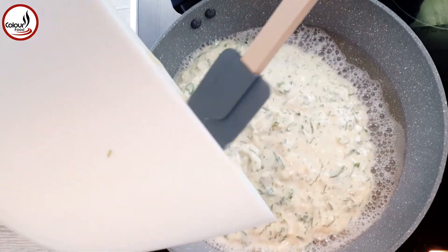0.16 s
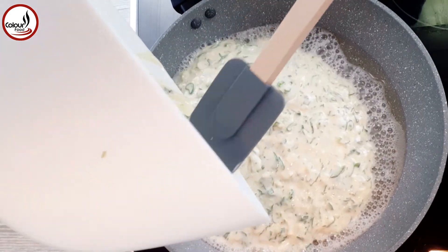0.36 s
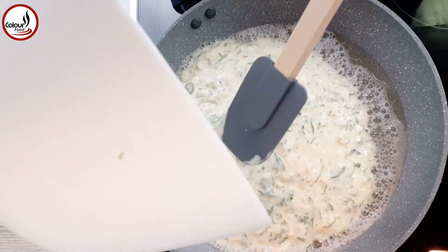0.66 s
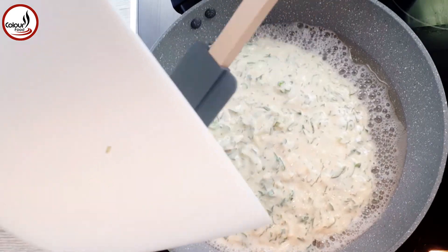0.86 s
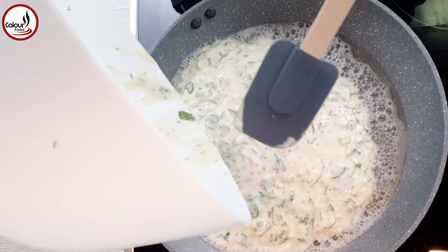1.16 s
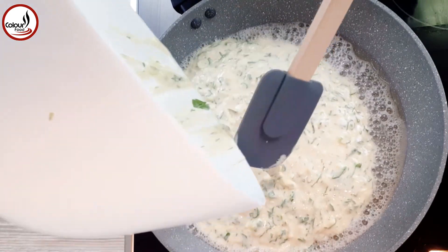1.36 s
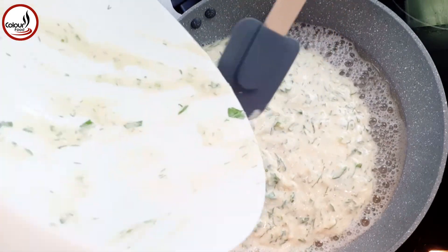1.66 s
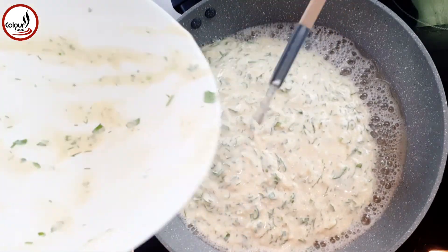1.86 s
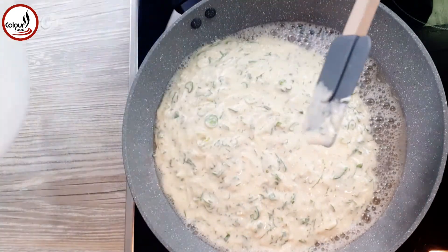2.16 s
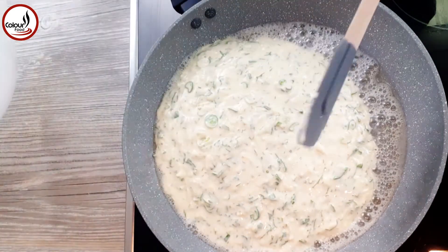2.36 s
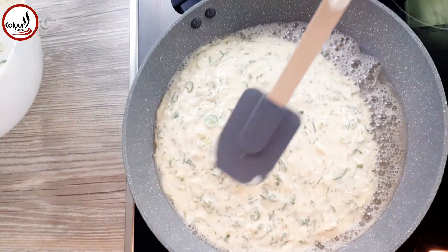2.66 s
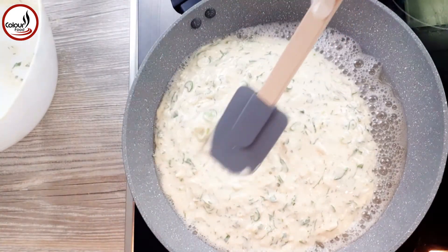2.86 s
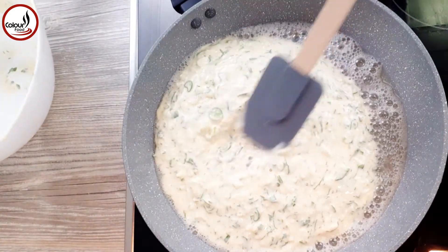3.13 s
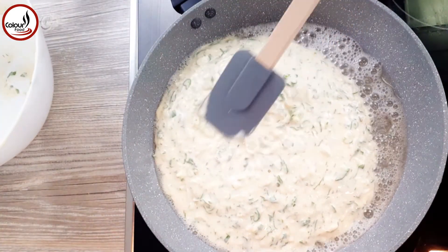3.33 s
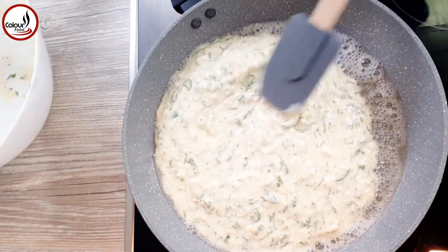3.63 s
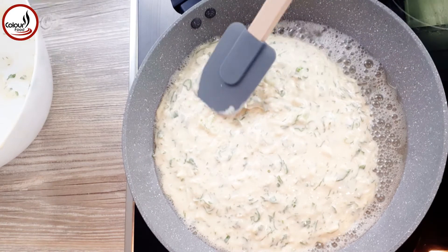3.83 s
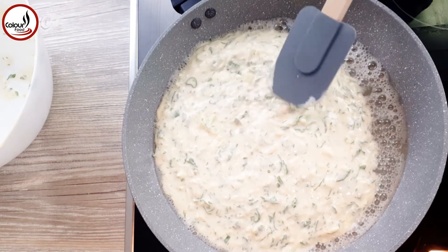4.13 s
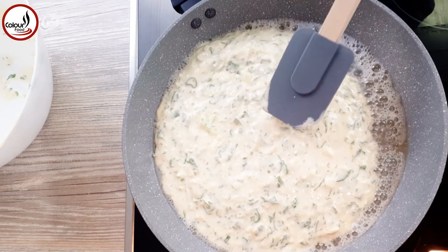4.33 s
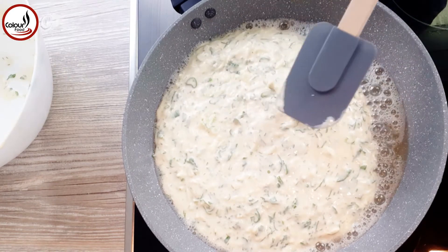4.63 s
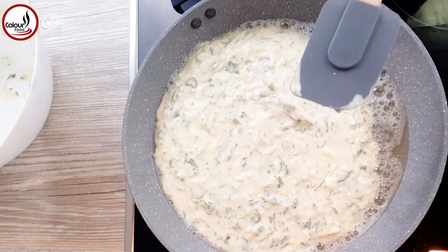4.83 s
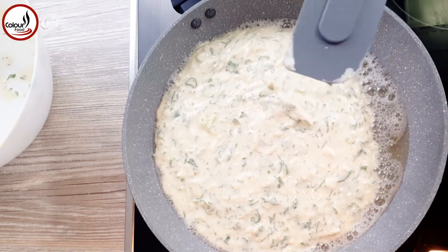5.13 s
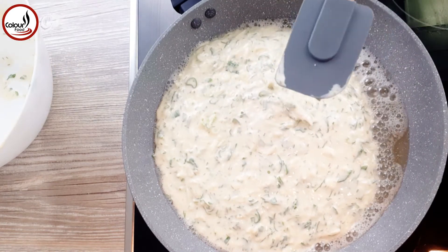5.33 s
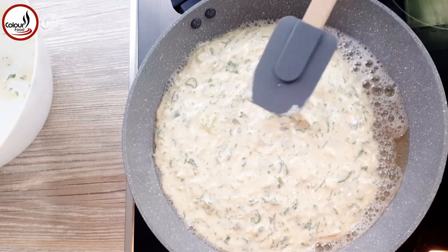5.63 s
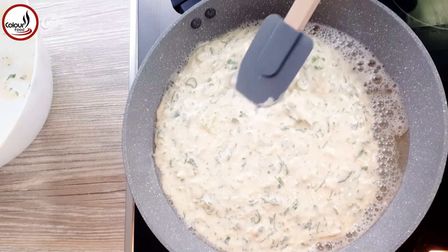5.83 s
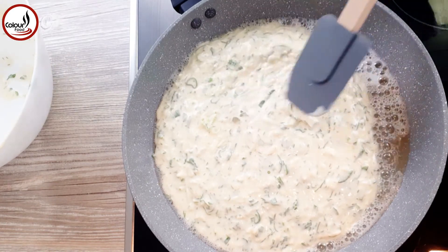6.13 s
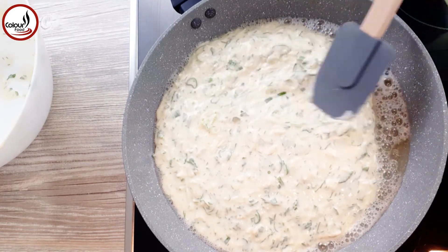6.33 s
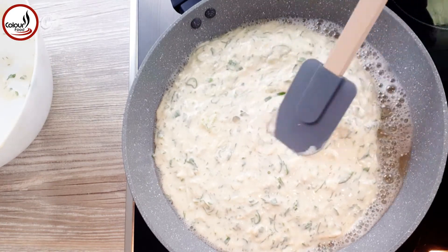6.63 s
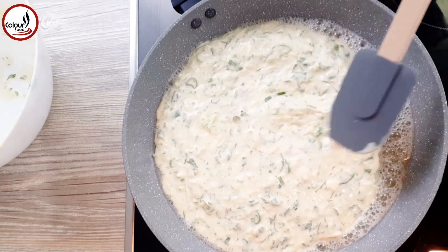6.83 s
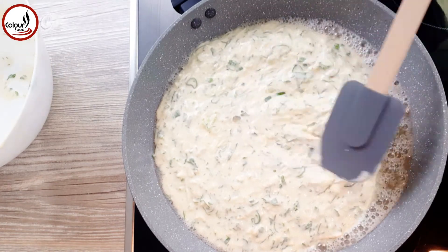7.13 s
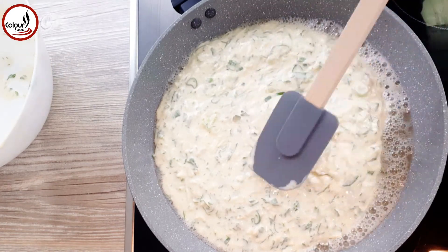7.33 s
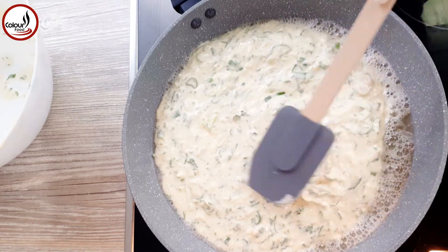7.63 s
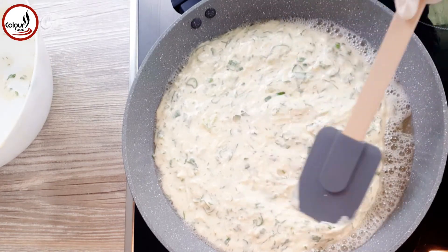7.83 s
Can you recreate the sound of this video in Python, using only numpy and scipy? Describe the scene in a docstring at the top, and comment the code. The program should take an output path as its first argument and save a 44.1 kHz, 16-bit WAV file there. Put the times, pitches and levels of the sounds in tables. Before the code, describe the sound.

Gentle frying crackle over a low kitchen hum, with bowl clinks, a heavy wooden knock as the bowl lands, and birds calling.

```python
"""Batter in a pan, a bowl and songbirds

Batter sizzles softly: shaped noise, crackling puffs, spits and short swells, low ones as a spatula smears it.
The spatula rubs a bowl, which clinks (decaying modes) and is set down on a wooden table (modes, dense thud).
Songbirds left, right and far off call outside: pure swept tones with sparse echoes. Over a low rumble, two
appliance hums near 100 Hz beat about 1.4 times a second, with a weaker one near 50 Hz; soft thumps come later."""
import sys
import numpy as np
from scipy import signal
from scipy.io import wavfile
from scipy.ndimage import uniform_filter1d

SR = 44100
rng = np.random.default_rng(int(sys.argv[2]) if len(sys.argv) > 2 else 0)


def log_audio(samples):
    """Write samples as a 16-bit WAV file to the path given in sys.argv[1]."""
    # one column per channel
    frames = np.atleast_2d(samples).T
    # limit to full scale, then quantise
    limited = np.clip(frames, -1, 1)
    pcm = np.round(limited * 32767).astype(np.int16)
    wavfile.write(sys.argv[1], SR, pcm)


N = 352345


def amp(db):
    """Linear gain of a level in dB."""
    return 10 ** (np.asarray(db, float) / 20)


def evened(x):
    """Scaled to rms 1."""
    return x / np.sqrt(np.mean(x ** 2) + 1e-20)


def read(points, hz):
    """Value of a (f/Hz, value) curve at hz, interpolated over log frequency."""
    f, value = np.transpose(points)
    return np.interp(np.log(hz + 1), np.log(f + 1), value)


def pan(side_db):
    """Left and right gains for a left-right level difference."""
    return amp([[side_db / 2], [-side_db / 2]])


def add(mix, start_s, sound):
    """Mixes a two-channel sound in, cut at the end of the mix."""
    part = mix[:, round(start_s * SR):][:, :sound.shape[1]]
    part += sound[:, :part.shape[1]]


def band(x, lo_hz, hi_hz):
    """Band-pass."""
    return signal.sosfilt(signal.butter(3, [lo_hz, hi_hz], "band", fs=SR, output="sos"), x)


def echoes(x, gap_s, t60_s, far_db, far_t60_s):
    """Sparse taps of random sign, other ones for each ear: near walls die fast, far ones slowly."""
    at = np.arange(0, SR, 20) + rng.integers(0, 20, (2, SR // 20))
    taps = np.zeros((2, SR + 20))
    np.put_along_axis(taps, at, rng.choice([-1., 1.], at.shape), 1)
    t = np.arange(taps.shape[1]) / SR
    decay = amp(-60 * t / t60_s) + amp(far_db - 60 * t / far_t60_s)
    taps *= decay * np.clip(t / gap_s - 1, 0, 1)  # silent up to gap_s, full from twice that
    return signal.fftconvolve(x, taps / np.linalg.norm(taps[0]), axes=1)[:, :N]


# left-right likeness of the noises: (f/Hz, correlation)
EAR_LIKENESS = [(60, 1), (130, 0.3), (290, 0.65), (640, .4), (1400, 0.34), (3100, 0.093), (6800, .2),
                (15000, 0.14)]


def noise(spectrum, size, patchy_db, flicker_db):
    """Random short-time spectra with drifting patches and a flicker shared by all bins."""
    frames, hz = 4 * N // size + 5, np.fft.rfftfreq(size, 1 / SR)
    a, b, c, d, patches = rng.standard_normal((frames, len(hz), 5)).T
    patches = uniform_filter1d(uniform_filter1d(patches, size=9, axis=0), size=9, axis=1)
    flicker = evened(uniform_filter1d(rng.exponential(1, frames) - 1, size=3))
    same = np.clip(read(EAR_LIKENESS, hz), -1, 1)[:, None]
    left = a + 1j * b
    right = same * left + np.sqrt(1 - same ** 2) * (c + 1j * d)
    level_db = patchy_db * evened(patches) + flicker_db * flicker
    bins = np.array([left, right]) * amp(read(spectrum, hz)[:, None] + level_db)
    return signal.istft(bins, nperseg=size, noverlap=size * 3 // 4)[1][:, :N]


# courses of sizzle and rumble before layer gains: (t/s, sizzle level/dB, rumble level/dB)
LAYER_LEVELS = [(0.0, -68, -75), (0.22, -69, -69.5), (0.49, -71, -75), (1.8, -74, -74.5),
                (2.31, -72, -73.5), (2.87, -73, -77.5), (3.0, -73.5, -87), (3.29, -75.5, -71.5),
                (3.49, -72.5, -71.5), (3.69, -75.5, -73.5), (4.3, -72.5, -75.5), (4.54, -72.5, -73.5),
                (6.34, -75.5, -76), (6.72, -75.5, -69), (6.96, -73, -74), (7.48, -76.5, -71),
                (7.63, -77, -77), (7.99, -78, -78.5)]
# sizzle spectrum: (f/Hz, relative density/dB per Hz)
SIZZLE_SPECTRUM = [(530, -39), (900, -9.5), (1310, -18), (1440, -7.5), (1570, -15.5), (1720, -5),
                   (1920, -4), (3960, -2), (4410, -4), (5750, -0.5), (7140, -6.5), (14200, -9),
                   (16000, -14)]


def sizzle():
    """Frying batter: fine hiss and a crackle of many small bubbles under one level course."""
    s, sizzle_db, _ = np.transpose(LAYER_LEVELS)
    hiss = noise(SIZZLE_SPECTRUM, size=256, patchy_db=2.5, flicker_db=0.7)
    hiss /= np.std(band(hiss, 6500, 15000).mean(0))
    crackle, which = np.zeros((2, N)), rng.integers(0, 12, N)
    bursts = rng.random(N) < 70 / SR  # 70 a second on average
    size = amp(4 * np.minimum(rng.exponential(1, N), 4)) * bursts
    for k, hz in enumerate(np.geomspace(4500, 14000, 12)):
        grain = puff(hz, rng.standard_normal(2000) + 1.86 * rng.standard_normal((2, 2000)))
        for at in np.flatnonzero(size * (which == k)):
            add(crackle, at / SR, size[at] * grain)
    level = amp(np.interp(np.arange(N) / SR, s, sizzle_db))
    return level * (amp(-1.0) * hiss + amp(4.5) * crackle)


def puff(hz, chance):
    """A bubble bursts: a sharp puff around its own pitch with a short hiss behind it."""
    t = np.arange(2000) / SR
    burst = chance * (amp(-60 * t / 0.0072) + amp(-4.0 - 60 * t / 0.0633))
    burst = band(burst, hz * 0.54, min(hz * 1.59, 17000))
    return burst / abs(burst).max()


# rumble spectrum: (f/Hz, relative density/dB per Hz)
RUMBLE_SPECTRUM = [(12, -43.5), (20, -11.5), (54, -11), (80, -17.5), (102, -13.5), (124, -4), (160, -14),
                   (209, -10.5), (387, -6.5), (498, -21.5), (608, -19), (857, -32), (1500, -39.5),
                   (1950, -64), (3300, -120)]
AFTER_DB, AFTER_T60_S = -33, 0.32  # table rumble after a landing: level re knock, decay


def rumble():
    """Low kitchen noise; the table rumbles on after each landing of the bowl."""
    s, _, rumble_db = np.transpose(LAYER_LEVELS)
    t = np.arange(N) / SR
    low = noise(RUMBLE_SPECTRUM, size=2048, patchy_db=3.0, flicker_db=0.5)
    low /= np.std(band(low, 150, 480).mean(0))
    after = np.zeros(N)
    for at, db, *_ in KNOCK_EVENTS:
        after += (t > at) * amp(db + AFTER_DB - 60 * np.maximum(t - at, 0) / AFTER_T60_S)
    return low * (amp(np.interp(t, s, rumble_db)) + after) * pan(2.3)


# appliance hums before pan: (f/Hz, peak level/dB)
HUM_TONES = [(99.95, -61.3), (98.565, -65), (49.7, -73)]
IN_STEP_S = 4.51  # a moment when the hums are in step


def hums():
    """Steady cosines; the pair near 100 Hz beats."""
    t = np.arange(N) / SR
    return pan(4.77) * sum(amp(db) * np.cos(2 * np.pi * hz * (t - IN_STEP_S)) for hz, db in HUM_TONES)


# single sweeps: (t/s, length/s, start f/Hz, end f/Hz, peak level/dB, left-right/dB)
SINGLE_SWEEPS = [(0.848, 0.0083, 2550, 1144, -66, 6), (5.6404, 0.028, 2120, 4080, -61.5, -3),
                 (6.791, 0.0062, 3310, 1540, -61, 0), (7.854, 0.01, 5740, 3300, -57.5, 1),
                 (7.8654, 0.038, 4010, 1990, -57.5, 3.5), (7.8678, 0.0065, 7250, 3350, -50.5, 3),
                 (7.873, 0.026, 7160, 4220, -57, 4.5)]
# two low trills, left: (t/s, level/dB)
TRILL_STARTS = [(.005, -44), (.0496, -41), (.091, -41.5), (.133, -43.5), (.178, -46), (.4246, -41),
                (.4675, -41), (.5055, -42.5), (.546, -43.5), (.5843, -45), (.631, -44.5)]
# their note: (t after start/s, length/s, start f/Hz, end f/Hz, level/dB, left-right/dB)
TRILL_SHAPE = [(0.00025, 0.0292, 1830, 2455, 0, 4.4)]
# pairs of falling ticks, right: (t/s, level/dB)
TICK_STARTS = [(4.483, -55.5), (4.698, -53), (4.914, -51), (5.104, -48), (5.297, -48.5), (5.481, -47)]
# one pair: (t after start/s, length/s, start f/Hz, end f/Hz, level/dB, left-right/dB)
TICK_SHAPE = [(0, 0.00573, 3220, 1520, -3, -9), (.042, 0.00824, 3110, 1740, -0.5, -8)]
# down-up-down calls, left: (t/s, level/dB)
TRIPLET_STARTS = [(7.2905, -41), (7.576, -41)]
# one call: (t after start/s, length/s, start f/Hz, end f/Hz, level/dB, left-right/dB)
TRIPLET_SHAPE = [(0, 0.0084, 3040, 1586, -0.5, 3.7), (.061, 0.0173, 1330, 2580, -8.5, 3.6),
                 (.083, .0104, 2925, 1630, .6, 1.5)]
# rattle note, a faint wide sweep round a strong core:
# (t after start/s, length/s, start f/Hz, end f/Hz, level/dB, left-right/dB)
RATTLE_SHAPE = [(0, .009, 3687, 8220, -5, 3.5), (.0015, 0.0085, 5300, 6960, -1, 3.2)]
RATTLE_START_S, RATTLE_END_S, RATTLE_RATE_HZ = 6.861, 7.16, 35.5
RATTLE_DB, RATTLE_FADE_DB = -54, -1.5  # start level, change by the end
UNEVEN_DB, UNEVEN_S = -0.5, 0.00122  # largest random offsets of a rattle note
RAGGED_DB = 1.5  # rms unevenness within a sweep, before trimming to its length


def sweep_rows():
    """All quick sweeps: (t/s, length/s, start f/Hz, end f/Hz, peak level/dB, left-right/dB)."""
    rattle = []
    starts = np.arange(RATTLE_START_S, RATTLE_END_S, 1 / RATTLE_RATE_HZ)
    for s, (late, loud) in zip(starts, rng.uniform(-1, 1, (20, 2))):
        fade_db = RATTLE_FADE_DB * (s - RATTLE_START_S) / (RATTLE_END_S - RATTLE_START_S)
        rattle.append((s + UNEVEN_S * late, RATTLE_DB + fade_db + UNEVEN_DB * loud))
    rows = list(SINGLE_SWEEPS)
    for calls, shape in ((TRILL_STARTS, TRILL_SHAPE), (rattle, RATTLE_SHAPE),
                         (TICK_STARTS, TICK_SHAPE), (TRIPLET_STARTS, TRIPLET_SHAPE)):
        rows += [row for s, db in calls for row in np.add(shape, [s, 0, 0, 0, db, 0])]
    return rows


def quick_sweeps():
    """Short tones gliding exponentially in pitch under a sine-shaped swell."""
    out = np.zeros((2, N))
    for s, length_s, start_hz, end_hz, db, side_db in sweep_rows():
        u = np.arange(0, 1, 1 / (length_s * SR))
        turns = np.cumsum(start_hz * (end_hz / start_hz) ** u) / SR
        sharp = 0.88 + 0.98 * abs(np.log2(end_hz / start_hz))  # wide sweeps are loud only in their middle
        ragged = evened(uniform_filter1d(rng.standard_normal(3000), size=150))[:len(u)]
        level = amp(db + RAGGED_DB * ragged) * np.sin(np.pi * u) ** sharp
        add(out, s, pan(side_db) * level * np.sin(2 * np.pi * turns))
    return out


def birds():
    """All calls, smeared by echoes from the yard."""
    out = quick_sweeps() + whistles() + far_coos()
    out[0] = np.roll(out[0], 1)  # reaches the left port one sample later
    return out + amp(-7) * echoes(out, gap_s=.004, t60_s=0.2, far_db=-26.5, far_t60_s=1.7)


# short swells of crackle, low ones as the spatula smears batter, others bursts of high hiss:
# (t/s, length/s, level/dB, centre f/Hz)
SWELL_EVENTS = [(0.093, 0.066, -67, 4520), (0.438, 0.058, -54, 3950), (0.558, 0.049, -68, 5500),
                (1.496, 0.047, -60, 6030), (2.265, 0.047, -60, 12000), (2.528, 0.081, -67.5, 3200),
                (2.589, 0.059, -62, 9000), (3.09, 0.051, -60.5, 11700), (3.341, 0.08, -63.5, 9000),
                (3.55, 0.061, -69, 11000), (3.903, 0.062, -62.5, 11000), (3.993, 0.048, -60.5, 7880),
                (4.171, 0.13, -74, 13000), (4.601, 0.048, -65, 7000), (5.03, 0.04, -72, 12000),
                (5.597, 0.078, -61.5, 4000), (5.885, 0.062, -61.5, 3877), (6.356, 0.091, -62, 3570),
                (7.241, 0.082, -67.5, 5430), (7.856, 0.074, -69, 9000)]


def crackle_swells():
    """Noise in clumps of tiny bursts under a short swell."""
    out, chance = np.zeros((2, N)), rng.standard_normal((len(SWELL_EVENTS), 4, 6000))
    for (s, length_s, db, hz), c in zip(SWELL_EVENTS, chance):
        c = c[:, :round(length_s * SR)]
        clumps = amp(4.7 * evened(uniform_filter1d(c[3], size=120)))
        fizz = band((c[0] + c[1:3]) * clumps, hz * .5, min(hz * 1.56, 17000))
        add(out, s, amp(db) * evened(fizz) * np.hanning(c.shape[1]))
    return out


# touches on the bowl:
# (t/s, peak level/dB, centre of excited modes f/Hz, left-right/dB, spread/octaves, crack re ring/dB, rise/ms)
CLINK_EVENTS = [(1.5253, -26.5, 9500, 0.5, 0.08, -16.5, 1.2), (1.9818, -40.5, 5400, 2, 0.14, 3, 0.38),
                (2.097, -31, 5300, 0, 0.2, -10, 0.6), (2.287, -18.5, 5670, -2.5, 0.2, -12, 0.27),
                (2.856, -39.5, 5030, 5, 0.02, -21.5, 14), (3.1016, -49.5, 7840, 5.5, .1, 7, 2.8),
                (3.139, -46, 5000, -0.5, 0.095, -4, 2.5), (3.223, -49, 6240, -3.5, 0.066, 6, 2.03),
                (5.3016, -37.5, 5300, -3, 0.084, -10.5, 0.87), (5.331, -41.5, 4215, -2, 0.2, -2, 2)]
# spatula rubs on the rim: (t/s, peak level/dB, rise/ms)
RUB_EVENTS = [(0.097, -53.5, 15), (0.225, -58, 18), (0.407, -55, 38), (0.4576, -43, 2.2), (.497, -51, 3.5),
              (0.552, -59, 13), (1.075, -52, 0.42), (1.1, -61, 8), (1.234, -44.5, 2.3), (1.251, -40.5, 2),
              (1.607, -53.5, 21)]
RUB_HZ, RUB_SIDE_DB, RUB_OCTAVES, RUB_CRACK_DB = 5747, -8.5, 0.1, -7
# bowl modes: (f/Hz, relative level/dB, t60/s)
BOWL_MODES = [(2270, -10.5, .04), (2830, -6, .04), (3700, -13, 0.092), (4220, 4.5, 0.0398),
              (4340, -17.5, .035), (4750, -4, 0.045), (5030, -12, 0.084), (5300, 1, 0.012),
              (5640, -5.5, 0.046), (5700, -13, 0.13), (6030, -6.5, 0.034), (6390, 2.5, 0.022),
              (6370, -4, 0.033), (7130, -5, 0.027), (7440, -11, .03), (7230, 1.5, 0.036),
              (8170, -10.5, 0.027), (8600, -3.5, 0.042), (9300, -7, 0.026), (9630, -7, 0.017),
              (9710, -24, .03), (10210, -3.5, 0.021), (10400, 1.5, 0.029), (11000, 14, 0.026)]


def bowl():
    """Each touch or rub cracks and rings the modes near its centre, in another phase mixture at each ear."""
    out, t = np.zeros((2, N)), np.arange(5000) / SR
    hz, db, t60_s = np.transpose(BOWL_MODES)[:, :, None]
    rub = RUB_HZ, RUB_SIDE_DB, RUB_OCTAVES, RUB_CRACK_DB
    touches = list(CLINK_EVENTS) + [(s, peak_db, *rub, rise_ms) for s, peak_db, rise_ms in RUB_EVENTS]
    phases = rng.random((len(touches), 2, len(BOWL_MODES), 1))
    bursts = rng.standard_normal((len(touches), 2, 5000))
    for touch, phase, burst in zip(touches, phases, bursts):
        s, peak_db, centre_hz, side_db, octaves, crack_db, rise_ms = touch
        weight = np.exp(-.5 * (np.log2(hz / centre_hz) / octaves) ** 2)
        ring = (weight * amp(db - 60 * t / t60_s) * np.sin(2 * np.pi * (hz * t + phase))).sum(1)
        crack = burst * (amp(-60 * t / 0.029) + amp(-10.0 - 60 * t / 0.16))
        crack = band(crack, centre_hz * .5, min(centre_hz * 1.546, 17000))
        sound = evened(ring) + amp(crack_db) * evened(crack)
        sound *= np.minimum(1000 * t / rise_ms, 1)
        add(out, s, amp(peak_db) * pan(side_db) * sound / abs(sound).max())
    return out + amp(-8.5) * echoes(out, gap_s=0.0018, t60_s=0.076, far_db=-26.5, far_t60_s=0.28)


# spits of oil: (t/s, peak level/dB, centre f/Hz, left-right/dB)
SPIT_EVENTS = [(0.165, -45, 4850, 1), (0.233, -50, 5700, -2.5), (0.805, -56, 5400, -13),
               (0.833, -42.5, 3346, 3.5), (0.875, -46.5, 6120, -7), (1.919, -46.5, 10800, 0.5),
               (2.1898, -49, 11000, 6), (2.435, -46, 6140, -3), (2.617, -46.5, 5800, -3),
               (2.9467, -53, 4000, 10), (3.6694, -55, 4710, 3), (4.0127, -45, 3560, -7),
               (4.1828, -50, 14500, 1), (4.2242, -53.5, 4150, 6), (5.0032, -51, 5100, 7),
               (5.9766, -45.5, 5900, 3), (6.1833, -46.5, 11000, 1), (6.275, -51, 8600, 5),
               (6.519, -49, 4690, 1), (7.4478, -52.5, 5150, 7), (7.9368, -50, 7700, 0.5)]


def spits():
    """Large single bubble bursts, partly alike at both ears."""
    out, chance = np.zeros((2, N)), rng.standard_normal((len(SPIT_EVENTS), 3, 2000))
    for (s, db, hz, side_db), c in zip(SPIT_EVENTS, chance):
        add(out, s, amp(db) * pan(side_db) * puff(hz, c[0] + 4.4 * c[1:]))
    return out


WOBBLE_SHARE, FLUTTER_DB = .008, 1.5  # pitch share and level by which a whistle wavers


def whistle(shape, pitch=1, pulses=(0, 0, 0)):
    """Pure tone along its shape; pitch and level waver, growing over the first 88 ms."""
    s, hz, db = np.transpose(shape)
    t = np.arange(0, s[-1], 1 / SR)
    waver = evened(uniform_filter1d(rng.standard_normal((2, 12000)), size=400))
    wobble, flutter = waver[:, :len(t)] * np.minimum(t / 0.088, 1)
    hz = pitch * uniform_filter1d(np.interp(t, s, hz), size=150, mode="nearest")
    hz = hz * (1 + WOBBLE_SHARE * wobble)
    start_s, rate_hz, half_depth_db = pulses
    pulse_db = -half_depth_db * (t > start_s) * (1 + np.cos(2 * np.pi * rate_hz * (t - start_s)))
    level = amp(np.interp(t, s, db) + FLUTTER_DB * flutter + pulse_db)
    return level * signal.windows.tukey(len(t), .1) * np.sin(2 * np.pi * np.cumsum(hz) / SR)


# call shapes: (t after start/s, f/Hz before pitch ratio, relative level/dB)
SWOOP_SHAPE = [(0, 3650, -16), (.003, 3306, -4), (.006, 2906, -0.5), (.011, 2440, 3), (.02, 1830, -5),
               (.03, 1480, -19.5), (.04, 1210, -37)]
RISE_SHAPE = [(0, 3103, -4), (.04, 3168, -1), (.085, 3399.5, -1)]
SLIDE_SHAPE = [(0, 3490, -11), (.028, 3060, -8), (.052, 2680, -2), (.1, 2600, 0.6), (.155, 2780, -7)]
STEP_SHAPE = [(0, 4160, -8), (.02, 4620, -1.1), (.04, 4760, -1.5), (.08, 4750, -20), (.09, 5000, -6),
              (.105, 5210, -2.5), (.13, 5100, -3), (.17, 5200, -25)]
HOOK_SHAPE = [(0, 2783, -5), (.01, 2837, -12), (.022, 2842, 1.6), (.03, 2437, -2), (.04, 2027, -10.5),
              (.05, 1950, -14), (.07, 2122, -8.5), (.12, 2033, -29)]
DIP_SHAPE = [(0, 4360, -6), (.012, 3840, -2.5), (.022, 3440, 1), (.042, 3820, .3), (.057, 4130, .6),
             (.072, 4340, -1), (.084, 5130, 1)]
ARCH_SHAPE = [(0, 3170, -10), (.012, 3860, -8), (.022, 4370, .3), (.032, 3870, -4), (.044, 3060, -12)]
# their calls; swoops are loud and falling: (t/s, level/dB, pitch ratio)
SWOOP_CALLS = [(1.0005, -41.5, 1.003), (1.194, -40.5, 1), (1.3965, -43, .997)]
RISE_CALLS = [(3.0, -71.5, 1.08), (3.4, -68.5, 0.99), (3.825, -67.5, .97)]
SLIDE_CALLS = [(2.762, -69, 1.07), (3.14, -64, 1.003), (3.545, -61, .98)]
STEP_CALLS = [(3.811, -66, 1.02), (4.296, -56, 1.01), (4.768, -52.5, 0.992)]
HOOK_CALLS = [(3.294, -50.5, .99), (3.642, -46.5, 1.007), (3.969, -46.5, 1.003), (4.259, -46.5, 0.99)]
DIP_CALLS = [(7.177, -76.5, 1.003), (7.356, -73, 1.003), (7.533, -73.5, .995)]
ARCH_CALLS = [(7.714, -69, 0.98), (7.833, -65, 0.97), (7.956, -69, .985)]
# faint high tones, one curve each: among them a coo's overtone (6.595 s) and the rattle's
# opening sweep (6.843 s): (t/s, f/Hz, level/dB)
HIGH_TONES = [
    [(3.03, 5940, -70), (3.06, 5890, -78), (3.085, 5970, -65), (3.1, 6200, -68)],
    [(6.595, 3350, -66.5), (6.63, 3260, -75), (6.68, 3400, -70)],
    [(6.67, 6360, -83), (6.71, 5900, -74.5), (6.73, 5251, -76)],
    [(6.843, 6560, -72), (6.858, 5670, -70), (6.872, 5570, -65), (6.888, 6500, -58)],
    [(7.27, 5650, -76), (7.32, 5550, -73), (7.33, 5250, -72), (7.345, 5200, -72)],
]
SLIDE_PULSES = .05, 42, 6  # (t after start/s, rate/Hz, half depth/dB)
LEFT_DB, RIGHT_DB = 4, -8.5  # left-right level of the two sides of the yard


def whistles():
    """Longer tones to the left and right, and faint high ones; slides fall, then pulse."""
    out = np.zeros((2, N))
    for shape, calls, side_db in ((SWOOP_SHAPE, SWOOP_CALLS, LEFT_DB), (RISE_SHAPE, RISE_CALLS, LEFT_DB),
                                  (STEP_SHAPE, STEP_CALLS, LEFT_DB), (HOOK_SHAPE, HOOK_CALLS, RIGHT_DB),
                                  (DIP_SHAPE, DIP_CALLS, RIGHT_DB), (ARCH_SHAPE, ARCH_CALLS, RIGHT_DB)):
        for s, db, pitch in calls:
            add(out, s, amp(db) * pan(side_db) * whistle(shape, pitch))
    for s, db, pitch in SLIDE_CALLS:
        add(out, s, amp(db) * pan(LEFT_DB) * whistle(SLIDE_SHAPE, pitch, SLIDE_PULSES))
    for tone in HIGH_TONES:
        start_s = tone[0][0]
        add(out, start_s, pan(RIGHT_DB) * whistle(np.subtract(tone, [start_s, 0, 0])))
    return out


# the bowl lands and rocks on the table:
# (t/s, peak level/dB, contact time scale/ms, extra level of modes below 200 Hz/dB)
KNOCK_EVENTS = [(2.856, -6.5, 0.053, 4.5), (2.962, -19.5, 1.02, 5), (3.089, -43, 0.61, .3),
                (3.113, -12, 0.87, .3), (3.34, -37, 2.7, -3), (3.353, -23, 1.6, -4)]
# long table modes: (f/Hz, relative level/dB, t60/s, left lead/rad)
TABLE_MODES = [(117.84, -5, 0.2, 0.15), (140.4, -13, .3, .2), (228, -16.5, 0.36, 0.3033),
               (274, -21, 0.24, 0.4), (323.6, -12.5, 0.37, .5), (339, -13.5, 0.26, 0.59),
               (396.3, -7, 0.18, .7), (424, -15.5, 0.06, 2.4), (495.7, -10.5, 0.043, 0.4),
               (537, -5, 0.18, .9), (604.4, -6.5, .16, 1.1), (639.6, -0.5, 0.1362, 1.1),
               (684.6, -8.5, 0.062, 0.95), (830, -14.5, 0.2316, 2.6), (1084, -28, 0.051, 1.4),
               (1150, -24, 0.09, 2), (1280, -23.5, .07, 3.04), (1436, -27.5, 0.11, 2.8),
               (1760, -26, 0.1, 2.4), (2740, -29, 0.087, 1.15)]
# dense short modes of the wood: (f/Hz, relative density/dB per Hz)
THUD_SPECTRUM = [(59, -42), (100, -11.5), (241, -18), (607, -4), (684, -8), (962, -34.5), (1130, -21),
                 (2230, -39), (2780, -39.5), (4680, -41.5), (5070, -34.5), (5390, -50), (12000, -62.5),
                 (15600, -97), (22000, -120)]


def knocks():
    """A push rings the table top: a dense short thud and a few long modes; longer contact sounds duller."""
    out, t = np.zeros((2, N)), np.arange(SR // 2) / SR
    hz, db, t60_s, lead = np.transpose(TABLE_MODES)[:, :, None]
    dense_hz = np.geomspace(300, 11000, 110)[:, None]
    dense_lead = read(np.array(TABLE_MODES)[:, [0, 3]], dense_hz)
    place = rng.standard_normal((len(KNOCK_EVENTS), len(TABLE_MODES), 1))
    spread = rng.random((len(KNOCK_EVENTS), 3, 110, 1))
    # the bowl settles on the wood and damps it after the first swings
    held = 1 + 1.057 * np.exp(-((t - .009) / 0.012) ** 2)
    for (s, peak_db, contact_ms, bass_db), spot_db, (shift, start, ears) in zip(KNOCK_EVENTS, place, spread):
        modes = amp(db + bass_db * (hz < 200) + 1.5 * spot_db - 60 * t / t60_s)
        modes = modes * (1 - np.exp(-t * hz / 1.95)) * held  # builds up over some cycles
        f, u = dense_hz * (1 + .04 * shift), t[:5000]
        dense_t60_s = 0.13 * (600 / f) ** 0.2985
        dense = amp(read(THUD_SPECTRUM, f) - 60 * u / dense_t60_s) * np.sqrt(f / 600)
        dense = dense * (1 - np.exp(-u * f / 4.46)) * held[:5000]
        ring = np.zeros((2, len(t)))
        for ear, side in enumerate((.5, -.5)):
            ring[ear] = (modes * np.sin(2 * np.pi * hz * t + side * lead)).sum(0)
            phase = 2 * np.pi * (f * u + start) + side * (dense_lead + 0.53 * ears - .8)
            ring[ear, :5000] += amp(1.5) * (dense * np.sin(phase)).sum(0)
        u = np.arange(400) / SR / (contact_ms / 1000)
        push = u * np.exp(-4 * u)
        ring = signal.oaconvolve(ring, push[None], axes=1)
        add(out, s, amp(peak_db) * pan(2.8) * ring / abs(ring.mean(0)).max())
    return out + amp(-17) * echoes(out, gap_s=0.0028, t60_s=.3, far_db=-30.5, far_t60_s=0.46)


# the spatula presses the pan on its hob: (t/s, level/dB, settled f/Hz, time scale/s)
THUMP_EVENTS = [(4.696, -57.5, 67.6, 0.14), (5.321, -54, 69, 0.097), (6.002, -62.5, 60, 0.14),
                (6.687, -50.5, 61, 0.15), (7.283, -57, 63.7, 0.22)]


def thumps():
    """Soft low swells of a sine whose phase runs ahead at first, then settles."""
    out = np.zeros((2, N))
    for s, db, hz, length_s in THUMP_EVENTS:
        u = np.arange(0, 3 * length_s, 1 / SR) / length_s
        swell = 4 * u * np.exp(1 - 4 * u)  # peaks at a quarter of the time scale
        turns = hz * length_s * u * (1 + 0.48 * np.exp(-3 * u))
        add(out, s, amp(db) * pan(2.6) * swell * np.sin(2 * np.pi * turns))
    return out


# coo shape: (t after start/s, f/Hz before pitch ratio, relative level/dB)
COO_SHAPE = [(0, 1814, 11.5), (.015, 1715, 1.1), (.05, 1680, 3), (.09, 1685, -2), (.13, 1686, 1.1),
             (.17, 1755, 2.8), (.2, 1775, -0.3), (.22, 1713, -4)]
# coos: (t/s, level/dB, pitch ratio)
COO_CALLS = [(5.1, -57.5, 1), (5.584, -56.5, 1.02), (6.083, -57, 1.003), (6.564, -59, 0.99)]


def far_coos():
    """A far bird coos, with long echoes of its own."""
    out = np.zeros((2, N))
    for s, db, pitch in COO_CALLS:
        add(out, s, amp(db) * pan(LEFT_DB) * whistle(COO_SHAPE, pitch))
    return out + amp(-11) * echoes(out, gap_s=.02, t60_s=1, far_db=0, far_t60_s=1.3)


def scene():
    """All sources together."""
    batter = sizzle() + crackle_swells() + spits()
    kitchen = rumble() + hums() + thumps()
    return batter + kitchen + birds() + bowl() + knocks()


EDGE_HZ = 15830  # upper band limit


def record(dry):
    """The microphone drops the deepest bass; then the band limit."""
    mic = signal.sosfilt(signal.butter(2, 38, "high", fs=SR, output="sos"), dry)
    low_pass = signal.firwin(511, EDGE_HZ, window=("kaiser", 9), fs=SR)
    return signal.oaconvolve(mic, low_pass[None], "same")


dry = scene()
out = record(dry)
log_audio(out)
```